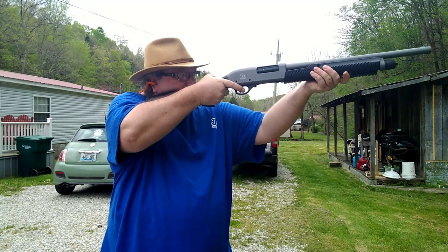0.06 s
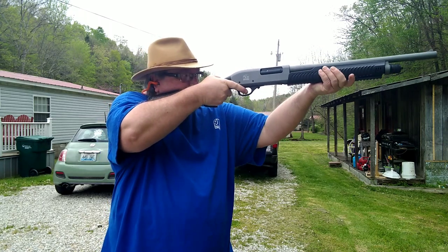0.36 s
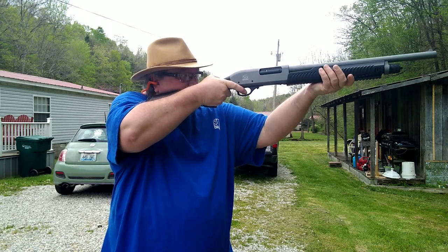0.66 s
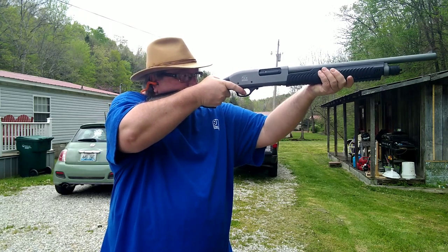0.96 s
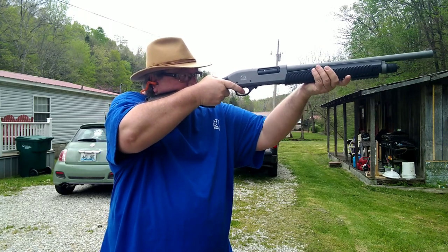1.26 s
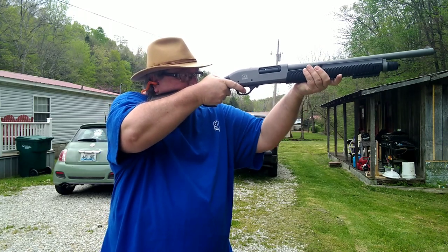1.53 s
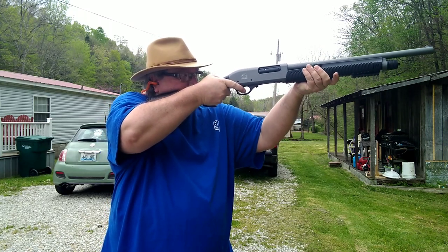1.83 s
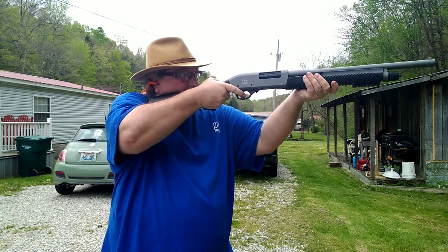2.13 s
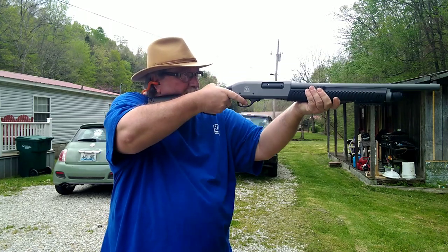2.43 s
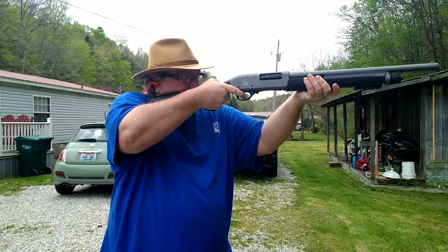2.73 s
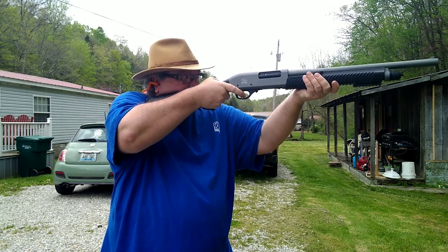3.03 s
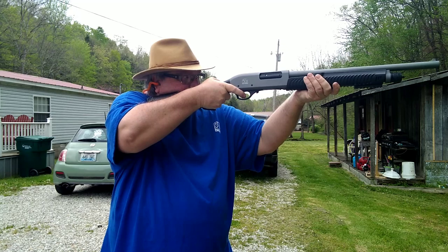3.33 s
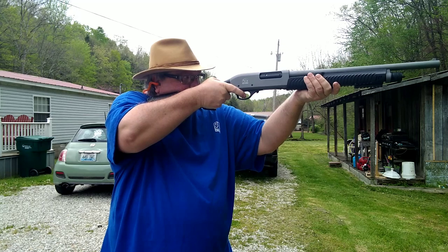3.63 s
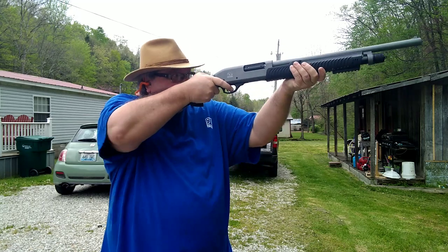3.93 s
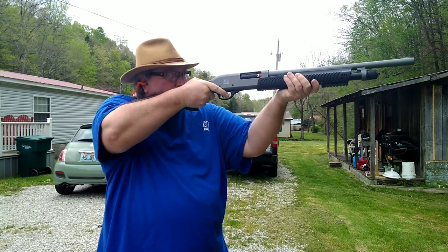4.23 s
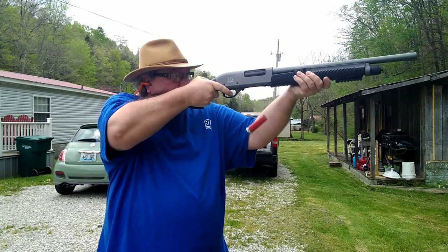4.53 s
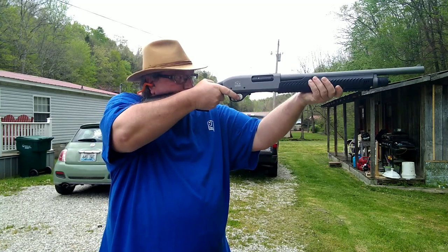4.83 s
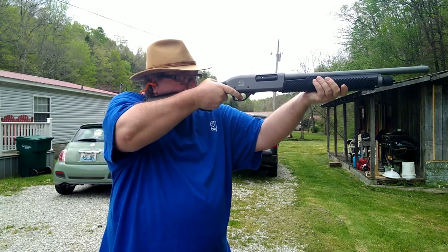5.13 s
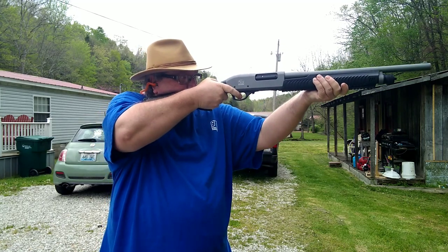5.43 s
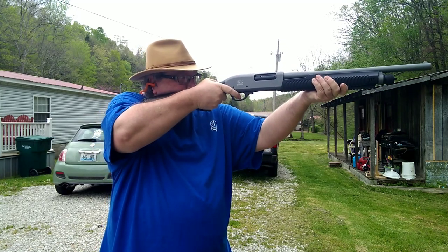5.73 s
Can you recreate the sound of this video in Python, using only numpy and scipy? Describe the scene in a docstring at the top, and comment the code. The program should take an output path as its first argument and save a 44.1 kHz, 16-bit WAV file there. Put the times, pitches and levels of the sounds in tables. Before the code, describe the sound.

An earlier shot's echo fades, then one loud shotgun blast, a clacking pump and an empty shell bouncing on gravel.

```python
"""Pump-action shotgun in a gravel yard between wooded hills. An earlier shot rolls away and its empty
hull lands. A light breeze rumbles on the microphone; three birds join in. The steel action clicks, and
at 4 s the gun fires: the blast overloads the microphone, slaps back from sheds and house, then dies in
the woods. The slide is racked with clacks and a squeal, the bolt slams shut and the barrel rings.
The ejected hull bounces on the stones while a bird warbles on."""
import sys
import numpy as np
from scipy import signal
from scipy.fft import rfft, irfft, next_fast_len
from scipy.io import wavfile
from scipy.ndimage import uniform_filter1d, minimum_filter1d

SR = 44100
rng = np.random.default_rng(int(sys.argv[2]) if len(sys.argv) > 2 else 0)


def dump(signal):
    """Clip the signal to [-1, 1] and save it as 16-bit WAV at the path in sys.argv[1]."""
    limited = np.clip(np.atleast_2d(signal).T, -1, 1)
    pcm = np.round(limited * 32767).astype(np.int16)
    wavfile.write(sys.argv[1], SR, pcm)


N = 263277
T = np.arange(N) / SR
EARLIER_SHOT_S, SHOT_S, LOCK_S = -0.73, 3.9745, 4.704

# hill echo spectrum, ROLL_AGE_S after a shot: f/Hz, relative density/dB
ROLL_SPECTRUM = [(25, -36.5), (50, -18.5), (90, -13), (155, -9), (215, -6.5), (320, -3), (450, -3),
                 (750, -8.5), (1100, -7.5), (2000, -13), (3300, -18), (5000, -23.5), (7000, -33),
                 (15000, -36.5)]
ROLL_AGE_S = 0.26
# hill echo early decay: f/Hz, t60/s
ROLL_DECAY = [(60, 2.3), (180, 1.95), (420, 2.56), (1000, 2.366), (2200, 1.95), (4000, 1.57), (7000, 1.43)]
# wooded slopes that swell the roll: delay/s, half width/s, boost/dB
SLOPE_SWELLS = [(.25, 0.23, 1.2), (1.379, 0.21, 2.5)]
# far rustle: f/Hz, relative density/dB
RUSTLE_SPECTRUM = [(59, -32.5), (100, -2.5), (287, -10), (319, -10), (712, -13.5), (861, -15), (2630, -19),
                   (3850, -24), (4860, -25), (7410, -29.5), (8410, -57), (15500, -47)]
# breeze on the microphone: f/Hz, relative density/dB
BREEZE_SPECTRUM = [(15, -41.5), (25, -16.5), (43, 3.5), (65, 8.5), (83, -1.5), (167, -30), (200, -14),
                   (260, -57.5), (440, -120)]
# gusts: t/s, half width/s, level/dB
BREEZE_GUSTS = [(0.848, .07, -60), (1.093, .03, -57), (1.24, 0.13, -53), (1.507, .035, -50.5),
                (1.83, .03, -69), (2.46, .04, -63), (2.951, 0.051, -52), (3.204, 0.03, -52),
                (3.518, 0.037, -54.5), (3.85, .06, -59)]
# close yard echo: f/Hz, relative density/dB
YARD_SPECTRUM = [(300, -15), (1200, -3), (3500, 1.5), (7000, 0.5)]
# hull landings: t/s, level/dB, low cut/Hz, spot ring/Hz, ring gain/dB, second touch delay/s, its gain/dB
HULL_LANDINGS = [(0.3869, 2, 1690, 4560, -3, .0012, -4.5), (5.1022, 8.5, 1250, 3880, 7, 0.0023, -5.5),
                 (5.3777, -3.5, 1960, 3970, 5.5, 0.0029, -9.5)]
# hull resonances: f/Hz, width/Hz, gain/dB
HULL_MODES = [(1320, 45, 13.5), (2520, 280, -16), (3720, 40, -5.5), (5450, 260, -5), (7020, 190, 1)]
# bird slurs: the first bird's notes, plus the third bird's first phrase near 2.94-3.09 s and two low answering
# calls near 2 kHz: t of top/s, rise/s, fall/s, top f/Hz, low f/Hz, level/dB
WARBLE_NOTES = [(.818, 0, 0.043, 4400, 3530, -74), (.878, .01, .01, 5100, 4200, -71),
                (.94, 0.043, 0.0096, 4900, 2350, -66.5), (.955, 0, 0.024, 4600, 2880, -71),
                (1.055, .024, 0.0057, 4600, 4150, -69), (1.052, 0, 0.025, 4800, 2600, -65),
                (2.935, 0, .1, 6050, 5450, -79), (3.02, 0, 0.054, 4600, 3500, -70),
                (3.089, .022, 0.028, 4900, 3650, -72), (3.09, .07, 0, 2250, 1930, -72),
                (3.365, .06, 0, 2220, 1930, -72.5), (4.884, .06, 0, 4580, 4130, -50),
                (4.926, 0, .062, 5900, 3430, -52), (5.593, .018, 0.034, 4350, 2950, -64.5),
                (5.712, .07, 0.0026, 4550, 2900, -64), (5.82, .04, 0.019, 3950, 2850, -63),
                (5.86, 0.0032, .045, 2950, 2530, -69)]
# second bird's whistles: t/s, level/dB
WHISTLE_NOTES = [(2.285, -67.5), (2.586, -61.5), (2.867, -57.5), (3.155, -57)]
# steel contacts in the action: t/s, level/dB, knock f/Hz, knock gain/dB, rattle decay/s, rebound/dB
ACTION_CLACKS = [(3.385, -36, 4000, -6, .006, -14), (4.1628, 11, 4320, 10.5, .0022, -26),
                 (4.2185, -5.5, 2430, -8, .0022, -19.5), (4.3793, 4.5, 1000, -4, .0023, -10),
                 (4.4066, 9, 1445, -0.5, 0.011, -13.5), (4.4553, 14.5, 1242, 9, .004, -5.5),
                 (4.4825, 14, 1500, 4, .0035, -4), (4.513, 1, 1500, -11, .0033, -15),
                 (4.6126, 2, 2030, 6, 0.0014, -12.5), (4.6237, 7.5, 1753, 7, 0.005, -11.5),
                 (4.653, -0.5, 1856, -11, 0.0078, -14), (4.6756, 5, 1930, 1, 0.015, -15),
                 (4.7037, 16, 1740, 2.5, 0.0036, -3)]
# gun resonances: f/Hz, width/Hz, gain/dB
ACTION_MODES = [(3720, 200, 6), (5160, 500, -11.5), (6750, 240, -23)]
# third bird's phrase: delay/s, length/s, first f/Hz, last f/Hz, gain/dB
PHRASE_NOTES = [(0, .08, 5780, 5900, -7.5), (.109, .04, 5480, 3980, 0), (.157, .043, 4900, 4480, -1.5)]
# its entries: t/s, pitch factor, level/dB
PHRASE_ENTRIES = [(3.514, 1.01, -71.5), (3.77, 1.0, -63)]
# muzzle blast: f/Hz, relative density/dB
BLAST_SPECTRUM = [(30, -21.5), (60, 8), (150, -0.5), (500, -2.5), (2000, -1), (3500, -5.5), (7000, -11),
                  (15000, -9)]
# returns from buildings and tree lines: delay/s, level/dB, centre f/Hz, swell/s
SLAP_ECHOES = [(.021, -9.5, 1350, 0.0064), (.033, -7.5, 477, .006), (.033, -9, 73.3, 0.0081),
               (.042, -9.5, 215, .012), (.08, -6.5, 437, 0.0082), (.155, -9, 490, .009),
               (.162, -24.5, 85, .02), (.228, -16.5, 460, .0075), (.238, -17, 210, 0.013),
               (.29, -17.5, 295, .018), (.307, -15.5, 1670, 0.004)]
# slide squeal pitch: t/s, f/Hz
SQUEAL_GLIDE = [(4.410, 4500), (4.428, 6230), (4.443, 7350), (4.455, 5684)]
# slide slips: t/s, half width/s, level/dB
SLIDE_SLIPS = [(4.422, .0035, -12), (4.4278, .001, -17), (4.434, .001, -12), (4.442, .0015, -23.5),
               (4.4505, .0012, -11.5)]
# barrel tones: f/Hz, level/dB, t60/s
BARREL_MODES = [(1093, -40, 1.0), (2066, -35, 1.0), (3569, -45, .3), (4366, -45, .25), (6638, -45, .2)]


def from_db(db):
    """Decibels to gain."""
    return 10 ** (np.asarray(db) / 20)


def unit_rms(x):
    """Scale to unit power."""
    return x / np.sqrt(np.mean(x ** 2) + 1e-20)


def at_hz(points, hz):
    """Read a table on a log-frequency axis."""
    points = np.array(points)
    return np.interp(np.log(hz), np.log(points[:, 0]), points[:, 1])


def butter(x, hz, kind, order=2):
    """Causal Butterworth filter."""
    return signal.sosfilt(signal.butter(order, hz, kind, fs=SR, output="sos"), x)


def add(out, at_s, sound):
    """Mix a sound in at at_s."""
    start = max(round(at_s * SR), 0)
    out[start:start + len(sound)] += sound[:N - start]


def bump(t, centre_s, half_s):
    """Gaussian of height 1."""
    return np.exp(-((t - centre_s) / half_s) ** 2)


def surge(t, swell_s):
    """Quick swell to 1, slower decay."""
    return t / swell_s * np.exp(1 - t / swell_s)


def coloured(spectrum, size=N, grain_db=0):
    """Unit-power noise of a given spectrum; grain makes it crackle."""
    padded = next_fast_len(size, True)
    white = rng.standard_normal(padded) * from_db(grain_db * rng.standard_normal(padded))
    hz = np.maximum(np.fft.rfftfreq(padded, 1 / SR), 1)
    return unit_rms(irfft(rfft(white) * from_db(at_hz(spectrum, hz)), padded)[:size])


def contact(rattle_s, tick=2.6):
    """Hard tick plus dying micro-rattle; unit energy."""
    t = T[:SR // 10]
    push = rng.standard_normal(len(t)) * np.exp(-t / rattle_s)
    push[0] += tick
    return push / np.linalg.norm(push)


def resonate(x, modes):
    """Input plus the resonances it excites."""
    out = x
    for hz, width_hz, db in modes:
        radius = np.exp(-np.pi * width_hz / SR)
        gain = from_db(db) * (1 - radius ** 2) / 2
        feedback = [1, -2 * radius * np.cos(2 * np.pi * hz / SR), radius ** 2]
        out = out + signal.lfilter([gain, 0, -gain], feedback, x + 1e-18)
    return out


def roll(shot_s, level_db=-16.5, attack_s=0.03, linger_after_s=1.84, linger_db_per_s=7.5):
    """Countless echoes from trunks and slopes; air takes more treble from longer paths."""
    age_s = np.maximum(T - shot_s, 0)
    padded = next_fast_len(N, True)
    spectrum = rfft(coloured(ROLL_SPECTRUM, size=padded, grain_db=5.0))
    hz = np.maximum(np.fft.rfftfreq(padded, 1 / SR), 1)
    echoes = np.zeros(N)
    for centre_hz, t60_s in ROLL_DECAY:
        share = at_hz([(f, f == centre_hz) for f, _ in ROLL_DECAY], hz)   # bands sum to one
        band = irfft(spectrum * share, padded)[:N]
        echoes += band * from_db(-60 * (age_s - ROLL_AGE_S) / t60_s)
    slopes_db = sum(db * bump(age_s, delay_s, half_s) for delay_s, half_s, db in SLOPE_SWELLS)
    linger_db = linger_db_per_s * np.maximum(age_s - linger_after_s, 0)   # far valley dies more slowly
    attack = np.minimum(age_s / attack_s, 1) ** 2
    return attack * from_db(level_db + slopes_db + linger_db) * echoes


def breeze(rustle_db=-66.5, calm_db=-66.5):
    """Woods rustle far off; a draught and gusts rumble on the microphone."""
    gusts = sum(from_db(db) * bump(T, at_s, half_s) for at_s, half_s, db in BREEZE_GUSTS)
    rustle = from_db(rustle_db) * coloured(RUSTLE_SPECTRUM)
    return rustle + (from_db(calm_db) + gusts) * coloured(BREEZE_SPECTRUM)


def yard(x, wet_db, t60_s, build_s):
    """Input plus scattered echoes from gravel, walls and trees."""
    t = T[:SR]
    tail = coloured(YARD_SPECTRUM, size=SR) * np.minimum(t / build_s, 1) ** 2 * from_db(-60 * t / t60_s)
    return x + from_db(wet_db) * signal.fftconvolve(x, tail / np.linalg.norm(tail))[:N]


def racking(wall_s=.187, wall_db=-33, scatter_s=.007, interval_s=4.745):
    """Action and slide, echoed by the yard and a far wall."""
    direct = action() + squeal()
    out = yard(direct, wet_db=-15.5, t60_s=0.28, build_s=0.0037)
    add(out, wall_s, from_db(wall_db) * signal.fftconvolve(direct, contact(scatter_s)))
    add(out, 0, out[round(interval_s * SR):].copy())   # last echoes of the earlier shot's racking
    return out


def hull(spot_width_hz=450, rattle_s=0.0017):
    """A brass-headed plastic tube hits stones, one end after the other; it rings, the snap echoes."""
    snaps, rings = np.zeros(N), np.zeros(N)
    for at_s, db, low_hz, spot_hz, spot_db, again_s, again_db in HULL_LANDINGS:
        modes = HULL_MODES + [(spot_hz, spot_width_hz, spot_db)]
        for delay_s, touch_db in (0, 0), (again_s, again_db):
            push = butter(contact(rattle_s, tick=2.9), low_hz, "high") * from_db(db + touch_db)
            add(snaps, at_s + delay_s, push)
            add(rings, at_s + delay_s, resonate(push, modes) - push)
    return rings + yard(snaps, wet_db=-21, t60_s=0.37, build_s=0.0195)


def tone(hz, db, waver=.009, waver_hz=250):
    """Sine with a random pitch waver."""
    wobble = unit_rms(butter(rng.standard_normal(len(hz)), waver_hz, "low"))
    phase = 2 * np.pi * np.cumsum(hz * (1 + waver * wobble)) / SR
    return from_db(db) * np.sqrt(2) * np.sin(phase)


def chirp(hz, db):
    """Bird note that swells and fades evenly."""
    progress = np.linspace(0, 1, len(hz))
    return tone(hz, db) * np.sqrt(4 * progress * (1 - progress))


def warbler(bend=.95):
    """Arched slurs, some only rising or falling: the first bird's notes, the third bird's first phrase and two
    low answering calls."""
    out = np.zeros(N)
    for top_s, rise_s, fall_s, top_hz, low_hz, db in WARBLE_NOTES:
        from_top = np.r_[np.linspace(1, 0, round(rise_s * SR)), np.linspace(0, 1, round(fall_s * SR))]
        add(out, top_s - rise_s, chirp(top_hz - (top_hz - low_hz) * from_top ** bend, db))
    return out


def whistler(length_s=.093, start_hz=2755, sag_hz=70, drop_hz=620, attack_s=.014, fade_db=13.5):
    """Second bird: a repeated whistle that sags, then drops in pitch and level."""
    out, t = np.zeros(N), T[T < length_s]
    progress = t / length_s
    hz = start_hz - sag_hz * progress - drop_hz * progress ** 6.5
    attack = np.minimum(t / attack_s, 1)
    for at_s, db in WHISTLE_NOTES:
        add(out, at_s, attack * tone(hz, db - fade_db * progress ** 2.9))
    return out


def action(knock_width_hz=550, low_hz=600, rebound_s=.007):
    """Steel parts meet and rebound once; the gun rings and the struck part adds its own knock."""
    out = np.zeros(N)
    for at_s, db, knock_hz, knock_db, rattle_s, rebound_db in ACTION_CLACKS:
        modes = ACTION_MODES + [(knock_hz, knock_width_hz, knock_db)]
        for delay_s, touch_db in (0, 0), (rebound_s, rebound_db):
            push = butter(contact(rattle_s), low_hz, "high") * from_db(db + touch_db)
            add(out, at_s + delay_s, resonate(push, modes))
    return out


def phrase_singer():
    """Third bird: thin high note, downslur, short closing note."""
    out = np.zeros(N)
    for at_s, pitch, db in PHRASE_ENTRIES:
        for delay_s, length_s, first_hz, last_hz, note_db in PHRASE_NOTES:
            hz = pitch * np.linspace(first_hz, last_hz, round(length_s * SR))
            add(out, at_s + delay_s, chirp(hz, db + note_db))
    return out


def blast(crack_db=-2.5, crack_s=0.0045, gravel_db=-7, gravel_s=0.012, glow_db=-24, glow_s=.05):
    """Muzzle crack, scatter from the gravel and the yard's short afterglow, summed in power."""
    age_s = np.maximum(T - SHOT_S, 0)
    crack = from_db(crack_db) * np.exp(-age_s / crack_s)
    gravel = from_db(gravel_db) * surge(age_s, gravel_s)
    afterglow = from_db(glow_db) * np.exp(-age_s / glow_s)
    return (T >= SHOT_S) * np.sqrt(crack ** 2 + gravel ** 2 + afterglow ** 2) * coloured(BLAST_SPECTRUM)


def slaps(edge_ratio=1.265):
    """Each large surface returns a short burst, coloured by its size."""
    out, t = np.zeros(N), T[:SR // 4]
    for delay_s, db, hz, swell_s in SLAP_ECHOES:
        envelope = surge(t, swell_s)
        band = butter(rng.standard_normal(2 * len(t)), [hz / edge_ratio, hz * edge_ratio], "band")
        burst = unit_rms(envelope * band[len(t):]) * np.sqrt(np.mean(envelope ** 2))
        add(out, SHOT_S + delay_s, from_db(db) * burst)
    return out


def squeal():
    """The slide sticks and slips on steel, highest in pitch where it moves fastest."""
    hz = np.interp(T, *np.transpose(SQUEAL_GLIDE))
    slipping = sum(from_db(db) * bump(T, at_s, half_s) for at_s, half_s, db in SLIDE_SLIPS)
    return slipping * tone(hz, db=0, waver=0.037, waver_hz=1000)


def barrel():
    """The steel tube rings on after the bolt slams shut."""
    age_s = np.maximum(T - LOCK_S, 0)
    return sum(from_db(db - 60 * age_s / t60_s) * np.sin(2 * np.pi * hz * age_s)
               for hz, db, t60_s in BARREL_MODES)


def scene():
    """Shots, gun handling, birds and breeze; mono."""
    shots = blast() + slaps() + roll(SHOT_S) + roll(EARLIER_SHOT_S)
    birds = yard(warbler() + phrase_singer() + whistler(), wet_db=-8.5, t60_s=1.1, build_s=.03)
    return (shots + racking() + barrel() + hull() + birds + breeze())[None]


def record(dry, bottom_hz=38, top_hz=7500, leak_db=-45, headroom_db=2.0, hiss_db=-93, stop_hz=17280):
    """Band-limited microphone: soft overload, fast peak limiter, hiss, steep final low-pass."""
    in_band = signal.sosfilt(signal.cheby1(10, .5, top_hz, fs=SR, output="sos"), dry)
    heard = in_band + from_db(leak_db) * dry
    headroom = from_db(headroom_db)
    saturated = butter(headroom * np.tanh(heard / headroom), bottom_hz, "high", order=4)
    gain = .95 / np.maximum(np.abs(saturated), .95)
    limited = saturated * uniform_filter1d(minimum_filter1d(gain, size=45), size=45)   # 1 ms windows
    hiss = from_db(hiss_db) * rng.standard_normal(N)
    return signal.sosfilt(signal.cheby2(12, 70, stop_hz, fs=SR, output="sos"), limited + hiss)


dry = scene()
out = record(dry)
dump(out)
```